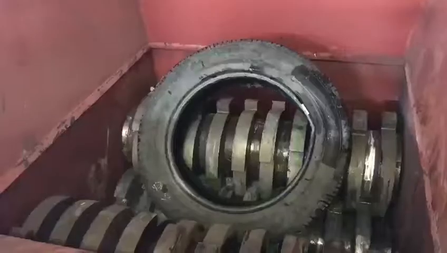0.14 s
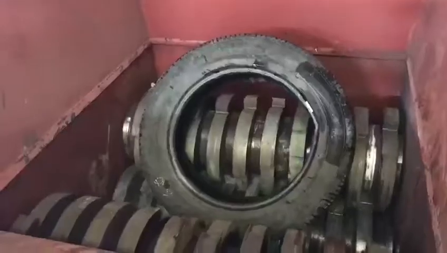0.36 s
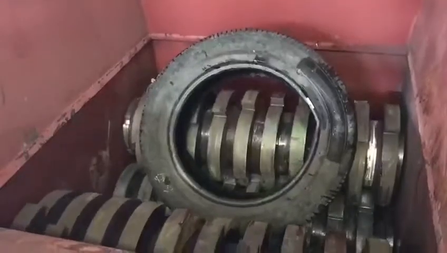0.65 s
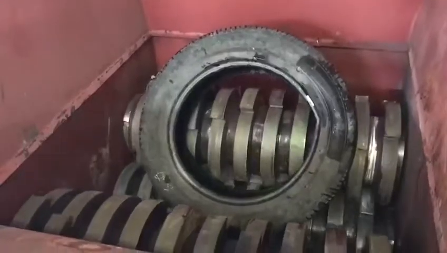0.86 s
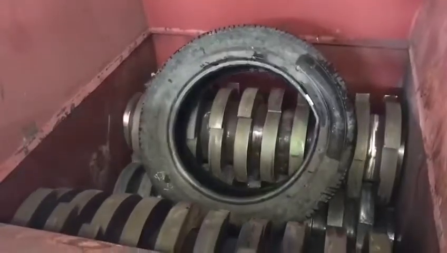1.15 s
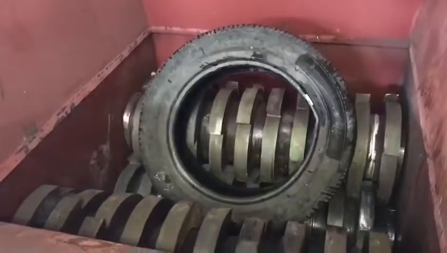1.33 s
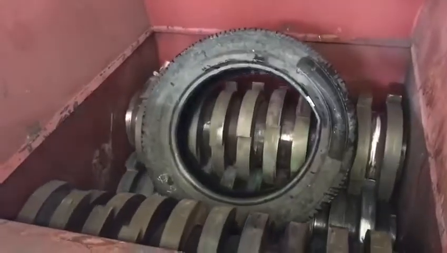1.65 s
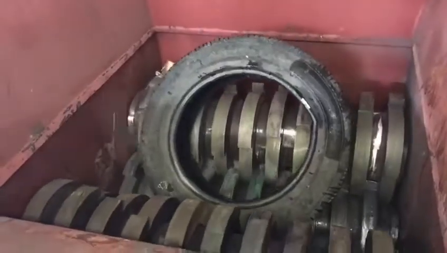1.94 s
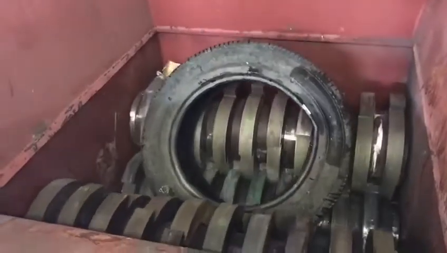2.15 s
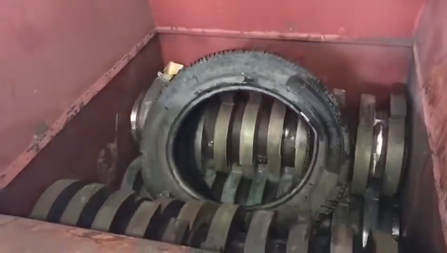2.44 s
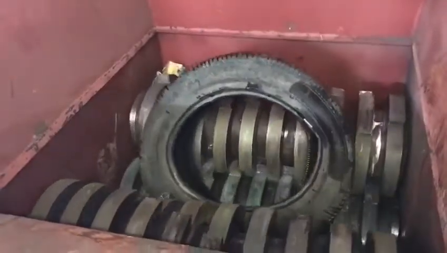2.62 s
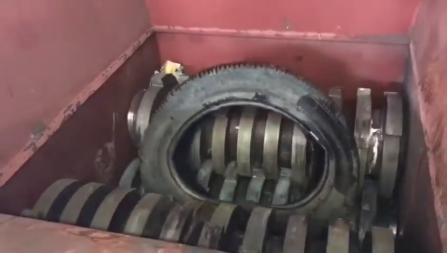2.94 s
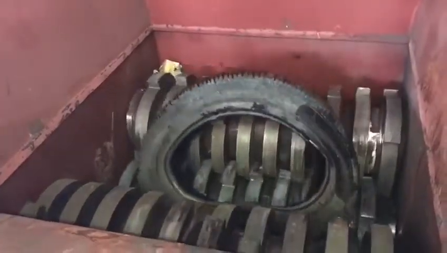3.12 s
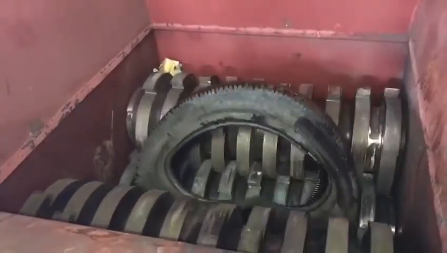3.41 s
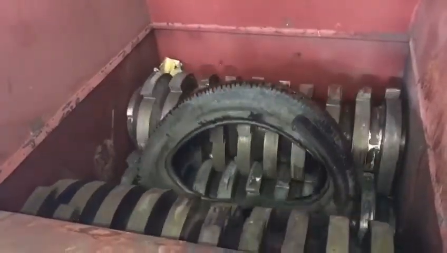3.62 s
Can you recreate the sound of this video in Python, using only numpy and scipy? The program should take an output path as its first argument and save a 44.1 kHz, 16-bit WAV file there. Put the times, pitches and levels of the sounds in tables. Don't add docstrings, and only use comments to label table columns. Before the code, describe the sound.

Close to a steel hopper, a shredder motor drones steadily; blades catch a tyre with a hollow boom, then harsh crunching, grinding and snapping take over as the microphone lowers its gain and briefly distorts.

```python
import sys
import numpy as np
from scipy import signal
from scipy.fft import rfft, irfft
from scipy.io import wavfile
from scipy.ndimage import uniform_filter1d

SR = 44100
rng = np.random.default_rng(int(sys.argv[2]) if len(sys.argv) > 2 else 0)


def store_wav(level_fs):
    pcm = np.round(np.clip(np.atleast_2d(level_fs), -1, 1) * 32767)
    wavfile.write(sys.argv[1], SR, pcm.T.astype(np.int16))


def voltage_ratio(level):
    return 10 ** (np.asarray(level, float) / 20)


N = 166257
T = np.arange(N) / SR
CARRIER_HZ = 3500


def evened(x):
    return x / np.sqrt(np.mean(x ** 2) + 1e-20)


def curve(points):
    p = np.transpose(points)
    return np.interp(T, p[0], p[1])


def colour(x, points):
    f, db = np.transpose(points)
    hz = np.fft.rfftfreq(N, 1 / SR)
    gain = voltage_ratio(np.interp(np.log(hz + 1), np.log(f + 1), db))
    return evened(irfft(rfft(x) * gain, N))


def resonate(x, hz, width):
    turn = np.exp(2j * np.pi * np.cumsum(hz * np.ones(len(x))) / SR)
    r = np.exp(-np.pi * abs(width) / SR)
    return 2 * (turn * signal.lfilter([1 - r], [1, -r], x / turn)).real


def slow(rate):
    t = T[::128]
    rates = np.geomspace(rate / 12, rate, num=16)
    drift = sum(np.sin(2 * np.pi * (f * t + rng.random())) / np.sqrt(f) for f in rates)
    return np.interp(T, t, evened(drift))


def tone(hz, db, waver_db):
    level = np.sqrt(2) * voltage_ratio(db + waver_db * slow(7))
    return level * np.sin(2 * np.pi * (hz * T + rng.random()) + .35 * slow(4))


def crackle(per_s, spread_db, smooth):
    size = voltage_ratio(spread_db * np.minimum(rng.exponential(1, N), 4))
    clicks = size * (rng.random(N) < per_s / SR) * rng.choice([-1, 1], N)
    return evened(clicks) + smooth * rng.standard_normal(N)


def patchy(x, depth_db):
    z = signal.stft(x, nperseg=512, noverlap=384)[2]
    field = rng.standard_normal(z.shape[::-1]).T
    field = evened(uniform_filter1d(uniform_filter1d(field, size=6, axis=0), size=14, axis=1))
    return evened(signal.istft(z * voltage_ratio(depth_db * field), nperseg=512, noverlap=384)[1][:N])


def whine():
    drive_hz, mains_hz = 34.9, 50.08
    # carrier multiple, drive multiple, level in dB.
    drive_lines = [(1, -5, -50), (1, -3, -52), (1, -1, -44), (1, 1, -41), (1, 3, -44), (1, 5, -37),
                   (2, -6, -57), (2, -4, -59), (2, -2, -53), (2, 0, -45.5), (2, 2, -51), (2, 4, -59),
                   (2, 6, -58)]
    # carrier multiple, mains multiple, level in dB.
    mains_lines = [(1, -5, -51), (1, -1, -44), (1, 1, -41), (1, 5, -51)]
    # pitch in Hz, level in dB, waver in dB.
    gear_tones = [(261, -24.5, .7), (226, -35, 3)]
    # time in seconds, gain in dB.
    gear_load = [(.15, -1.5), (.41, -0.5), (.73, -1), (1.0, 0), (1.3, 0), (1.72, 1.5), (2.14, 2.5),
                 (2.3, -4.5), (2.7, 3), (2.8, -9), (3.77, -4)]
    # time in seconds, level in dB.
    ripple = [(0.15, -22), (0.2, -24), (0.3, -23), (0.44, -34), (0.47, -27), (0.84, -24), (1.03, -37),
              (1.13, -24.5), (1.28, -21), (1.51, -24), (1.55, -30.5), (1.73, -35), (1.76, -25), (1.97, -24),
              (2.19, -33), (2.3, -22)]

    second_db = 6 * np.exp(-((T - .65) / .4) ** 2) - 1 - 5 * (T > 1.93)
    out = np.zeros(N)
    for c, k, db in drive_lines:
        out = out + tone(c * CARRIER_HZ + k * drive_hz, db + (c - 1) * second_db, 1.5 * c)
    for c, k, db in mains_lines:
        out = out + tone(c * CARRIER_HZ + k * mains_hz, db, 0.83)
    out = out + voltage_ratio(curve(gear_load)) * sum(tone(*row) for row in gear_tones)
    load_drop_db = -10 * np.clip((T - 2.2) / .15, 0, 1)
    return out + voltage_ratio(curve(ripple)) * tone(6 * mains_hz, load_drop_db, .4)


def motor_wash():
    # frequency in Hz, level in dB per Hz.
    wash_spectrum = [(26, -38), (45, -5.5), (200, 1), (300, 0.5), (420, -6.5), (1130, -3), (2300, -15.5),
                     (4500, -26.5), (11900, -38.5)]
    # frequency in Hz, width in Hz, level in dB.
    housing = [(49.7, 26, -36.5), (434.7, 20, -39), (612, 120, -38), (1220, 1500, -45), (1774, 580, -40),
               (3540, 760, -45.5), (1164, 7.2, -36.5), (1675, 9.1, -39), (1816, 18, -41)]
    wash = voltage_ratio(-24.5) * patchy(colour(crackle(3000, 4.5, 2.4), wash_spectrum), 0.22)
    loading = np.clip((T - 1.78) / 0.11, 0, 1)
    for hz, width, db in housing:
        level = voltage_ratio(db + 3.04 * slow(7.87) - 6.6 * (width < 40) * (hz > 1000) * loading)
        ringing = resonate(resonate(rng.standard_normal(N), hz, width), hz, width)
        wash = wash + level * evened(ringing)
    return wash * voltage_ratio(.6 * slow(30))


def motor():
    # time in seconds, gain in dB.
    idle_gain = [
        (.12, -0.5),
        (1.7, -0.5),
        (2.2, -0.5),
        (2.5, 1.5),
        (2.75, -15),
        (3.1, -10),
        (3.77, -12),
    ]
    return voltage_ratio(curve(idle_gain)) * (whine() + motor_wash())


def frame():
    # peak in seconds, pitch in Hz, level in dB, half length in seconds.
    shudders = [(1.372, 51, -29.5, 0.055), (1.93, 50.1, -27.5, 0.096), (2.27, 50.7, -23, 0.083),
                (2.356, 54.6, -17, 0.019), (2.49, 63.9, -22, 0.095), (2.796, 50.1, -14.5, 0.037),
                (2.92, 50.05, -15.5, 0.07), (3.08, 54.1, -25, 0.053), (3.336, 51, -20, 0.045),
                (3.443, 50.3, -20.5, 0.066), (3.71, 58.1, -28, 0.03)]
    # frequency in Hz, width in Hz, start in seconds, end in seconds, level in dB.
    modes = [
        (117.7, 7.7, 2.3, 2.73, -24),
        (183.5, 9, 2.3, 2.75, -29),
        (183.5, 7.4, 2.82, 3.3, -27),
        (143, 4.8, 2.78, 3.2, -33),
        (433.3, 9.9, 2.1, 3.1, -31.5),
        (619, 11, 2.9, 3.05, -38),
        (259.3, 1.7, 2.3, 2.72, -28.5),
    ]
    wobble = np.cumsum(1 + 0.037 * slow(14)) / SR
    out = np.zeros(N)
    for s, hz, db, half in shudders:
        surge = np.exp(-.5 * ((T - s) / half) ** 2)
        out = out + np.sqrt(2) * voltage_ratio(db) * surge * np.sin(2 * np.pi * hz * wobble)
    for hz, width, start, end, db in modes:
        ringing = evened(resonate(rng.standard_normal(N), hz * (1 + 0.031 * slow(5)), width))
        fade = np.clip(np.minimum(T - start, end - T) / 0.033, 0, 1)
        out = out + voltage_ratio(db) * ringing * fade
    return out


def tearing():
    # peak in seconds, hiss in dB, grind in dB, rise in seconds.
    bites = [(1.61, -39.5, -31, 0.011), (1.765, -33.5, -22.5, 0.0099), (1.965, -35, -45, 0.047),
             (2.033, -29, -44, .004), (2.047, -21, -18, 0.0033), (2.11, -45, -44, .015),
             (2.19, -24.5, -38, 0.022), (2.241, -22.5, -24, 0.023), (2.304, -13.5, -15, 0.024),
             (2.35, -15, -29, 0.0085), (2.42, -19, -30, 0.024), (2.48, -22, -17, 0.032),
             (2.552, -19.5, -47, 0.0036), (2.61, -17.5, -24, 0.032), (2.664, -16, -15, 0.035),
             (2.74, -37, -20.5, 0.022), (2.79, -15.5, -16, 0.023), (2.85, -34, -18, 0.03),
             (2.925, -15, -14.5, 0.094), (3.018, -24, -12.5, 0.0029), (3.13, -21, -24.5, 0.014),
             (3.175, -20, -19, 0.0086), (3.201, -16, -11.5, 0.0046), (3.29, -26, -17, 0.095),
             (3.411, -31, -17, 0.0058), (3.487, -20, -16.5, 0.018), (3.53, -44, -16.5, 0.022),
             (3.586, -32, -18, 0.005), (3.67, -51, -36, .03), (3.75, -25.5, -34, 0.06)]
    # frequency in Hz, level in dB per Hz.
    hiss_spectrum = [(1500, -4.5), (2400, -9.5), (2850, -7), (3400, -4), (4500, -3.5), (5100, -7.5),
                     (6200, -6), (9800, -12.5), (11900, -18.5)]
    # frequency in Hz, level in dB per Hz.
    grind_spectrum = [(28, -22), (60, 1.5), (120, 3), (250, -1), (500, 1), (1000, 0.5), (2000, -4.5),
                      (3500, -8.5), (7000, -28.5)]
    # time in seconds, level in dB.
    drag = [(1.9, -73), (1.96, -28), (2.2, -38), (2.3, -23.5), (3.0, -20), (3.08, -25.5), (3.3, -21),
            (3.6, -26.5), (3.77, -21.5)]
    hiss_fall_s, grind_fall_s = 0.035, 0.054

    hiss = voltage_ratio(2 * curve(drag))
    grind = voltage_ratio(2 * (curve(drag) + 0.5))
    for s, hiss_db, grind_db, rise in bites:
        up = np.exp(-((T - s) / rise) ** 2)
        after = abs(T - s)
        hiss = hiss + voltage_ratio(2 * hiss_db) * np.where(T < s, up, np.exp(-2 * after / hiss_fall_s))
        grind = grind + voltage_ratio(2 * grind_db) * np.where(T < s, up, np.exp(-2 * after / grind_fall_s))
    judder = slow(90)
    bright = patchy(colour(crackle(6000, 2.4, 0.81), [(700, -35)] + list(hiss_spectrum)), 1.88)
    rough = patchy(colour(crackle(2500, 3.0, 1.88), grind_spectrum), 2.47)
    return np.sqrt(hiss) * voltage_ratio(0.29 * judder) * bright + np.sqrt(grind) * voltage_ratio(judder) * rough


def snaps():
    # time in seconds, peak in dB, ring in Hz.
    cords = [
        (1.9647, -21, 3690),
        (2.0331, -19, 3540),
        (2.046, -17, 1510),
        (2.5504, -13, 1760),
        (3.016, -18, 1300),
        (3.1989, -9, 1080),
        (3.405, -14, 1790),
        (3.508, -22, 1800),
        (3.525, -18, 1500),
        (3.585, -12, 2080),
    ]
    out, t = np.zeros(N), np.arange(SR // 20) / SR
    for s, db, hz in cords:
        crack = signal.lfilter([1, -.9], [1, -.45], rng.standard_normal(len(t)))
        ring = np.sin(2 * np.pi * hz * t) + .6 * evened(resonate(crack, hz, 350))
        burst = crack + voltage_ratio(4) * ring
        out[round(s * SR):][:len(t)] += voltage_ratio(db - 9) * np.exp(-t / .005) * burst
    return out


def pops():
    # start in seconds, peak in dB, pitch in Hz, swell time in seconds.
    booms = [(1.7635, -0.5, 431, 0.0033), (1.764, -10, 786, 0.0019), (1.7754, -3, 420, 0.0024),
             (1.7838, -6, 436, .003), (1.7965, -6, 397, .003), (1.791, -18, 903, 0.0052),
             (2.027, -12, 353, .004), (2.048, -3.5, 472, 0.0027), (2.048, -5.5, 710, 0.0032),
             (2.058, -11, 900, 0.0027), (2.062, -7.5, 400, 0.0035), (2.163, -22, 420, .006),
             (2.211, -23, 436, .006), (2.239, -14, 492, 0.0043), (2.325, -12, 433, 0.016),
             (2.337, -14, 351, 0.02), (2.387, -8.5, 598, 0.0042), (2.421, -14, 430, .007),
             (2.447, -14, 360, 0.0077), (2.615, -16, 606, .012), (2.643, -15, 438, 0.012),
             (2.655, -14, 610, .014), (2.707, -21, 475, 0.0075), (2.79, -16, 616, 0.0091),
             (2.835, -11, 460, 0.0055), (2.905, -17, 405, .008), (3.018, -8.5, 443, 0.015),
             (3.02, -10, 607, 0.0086), (3.038, -11.5, 478, 0.0085), (3.2, -4, 299, 0.0066),
             (3.213, -4.5, 385, 0.0079), (3.246, -17, 403, 0.012), (3.279, -10, 360, 0.014),
             (3.368, -13, 442, .007), (3.409, -14, 448, 0.012), (3.482, 0, 456, 0.0093),
             (3.501, -11, 584, 0.0062), (3.524, -5, 480, 0.0055), (3.587, -11, 458, 0.01)]
    # pitch ratio, level in dB.
    boom_modes = [(0.999, -0.5), (1.45, -13), (2.1, -16), (2.8, -23)]
    out, t = np.zeros(N), np.arange(SR // 6) / SR
    puff = colour(rng.standard_normal(N), [(150, -10), (400, 9), (1400, -4.5), (3500, -58.0)])
    for s, db, hz, swell in booms:
        ring = np.zeros(len(t))
        for k, mode_db in boom_modes:
            envelope = (k * t / swell * np.exp(1 - k * t / swell)) ** 1.19
            ring = ring + voltage_ratio(mode_db) * envelope * np.sin(2 * np.pi * hz * k * t)
        at = round(s * SR)
        part = out[at:][:len(t)]
        part += voltage_ratio(db - 4.0) * ring[:len(part)]
        breath = voltage_ratio(db - 23) * np.minimum(t / swell, 1) * np.exp(-t / (4.7 * swell))
        part += breath[:len(part)] * puff[at:][:len(t)]
    return out


def hopper(x):
    at = np.arange(200, SR // 2, 20)
    at = at + rng.integers(0, 20, len(at))
    taps = np.zeros(SR // 2 + 20)
    taps[at] = rng.choice([-1., 1.], len(at)) * voltage_ratio(-60 * at / SR / 0.3)
    return signal.fftconvolve(x, taps / np.linalg.norm(taps))[:N]


def scene():
    knocks = pops() + snaps()
    return (motor() + tearing() + knocks + voltage_ratio(-12) * hopper(knocks) + frame())[None]


def limiter(x):
    ceiling = .8
    knee = .7 * ceiling
    room = ceiling - knee
    bent = knee + room * np.tanh((abs(x) - knee) / room)
    soft = np.sign(x) * np.where(abs(x) > knee, bent, abs(x))
    free = (T > 2.312) & (T < 2.345)
    return np.where(free, 1.4 * x, soft)


def lose_treble(x):
    # start in seconds, end in seconds, low edge in Hz, high edge in Hz.
    holes = [
        (.46, .62, 4100, 4600),
        (.48, .6, 7300, 10200),
        (.7, .95, 7300, 10600),
        (0, 1.65, 11450, 12500),
    ]
    hz, t, z = signal.stft(x, SR, nperseg=1024, noverlap=768)
    hz = hz[:, None]
    rag = rng.standard_normal(z.shape[::-1]).T
    rag = evened(uniform_filter1d(uniform_filter1d(rag, size=4, axis=1), size=8, axis=2))
    nearby = uniform_filter1d(uniform_filter1d(abs(z), size=5, axis=1), size=5, axis=2)
    off_whine = abs(hz - 2 * CARRIER_HZ) > 150
    lost = (nearby < voltage_ratio(-63)) & (rag > 1.45) & (hz > 3800) & off_whine
    for start, end, low, high in holes:
        in_band = (hz > low + 200 * np.maximum(rag, -.5)) & (hz < high + 500 * rag)
        in_time = (t > start + .015 * rag) & (t < end + .015 * rag)
        lost = lost | (in_band & in_time)
    return signal.istft(z * ~lost, SR, nperseg=1024, noverlap=768)[1][:, :N]


def top_cut(x):
    return signal.sosfilt(signal.butter(12, 15870, fs=SR, output="sos"), x)


def record(dry):
    low_pass = signal.firwin(801, 11950, window=("kaiser", 9), fs=SR)
    x = signal.oaconvolve(limiter(dry), low_pass[None], "same")
    x = lose_treble(x)
    opening = np.clip((T - .1203) * 2000, 0, 1)
    x = np.clip(x * opening, -.93, .93)
    return top_cut(x)


dry = scene()
out = record(dry)
store_wav(out)
```